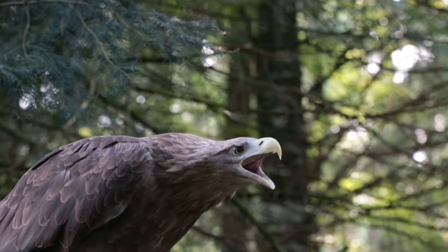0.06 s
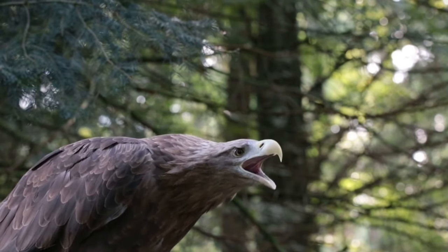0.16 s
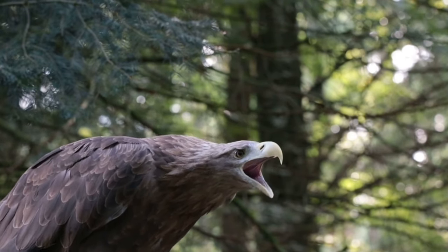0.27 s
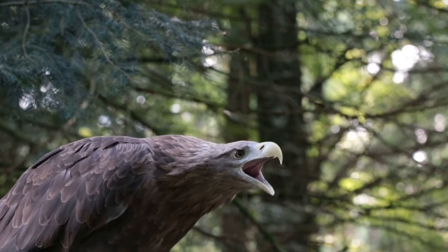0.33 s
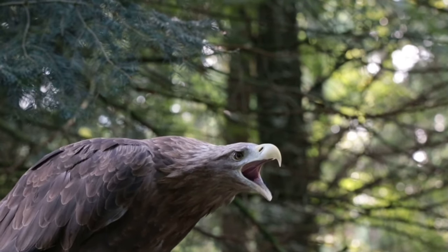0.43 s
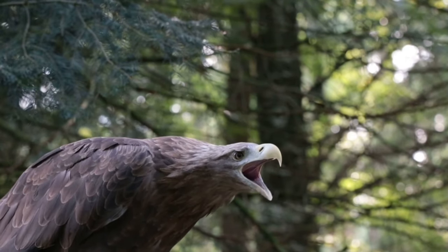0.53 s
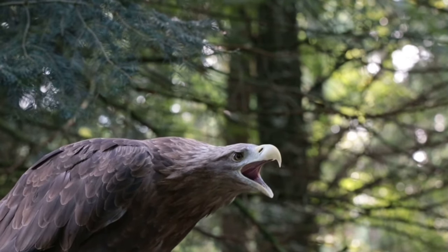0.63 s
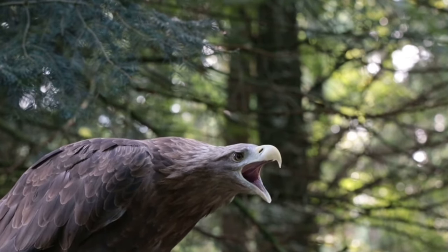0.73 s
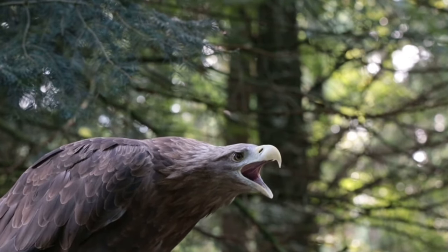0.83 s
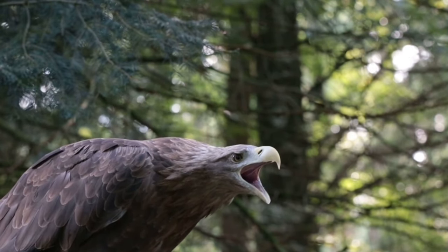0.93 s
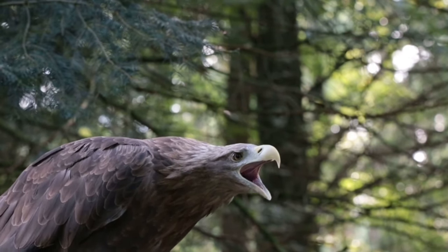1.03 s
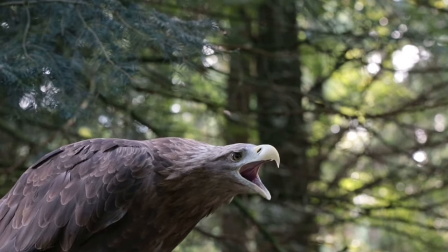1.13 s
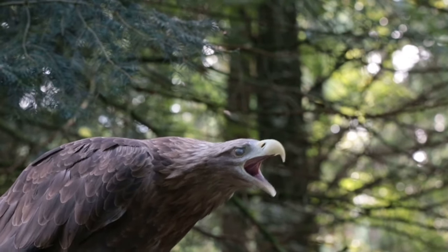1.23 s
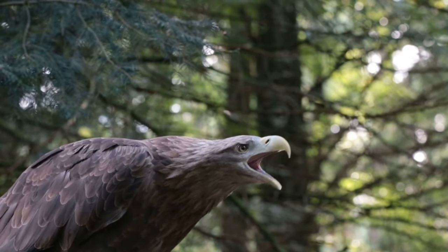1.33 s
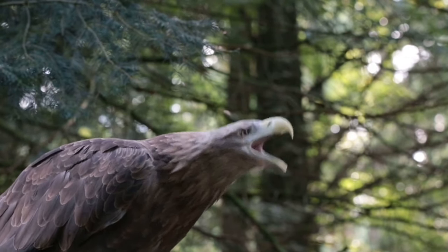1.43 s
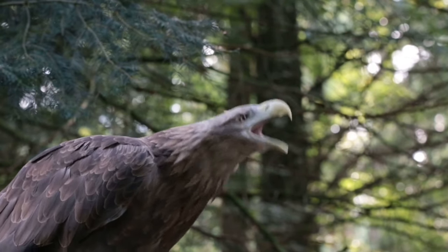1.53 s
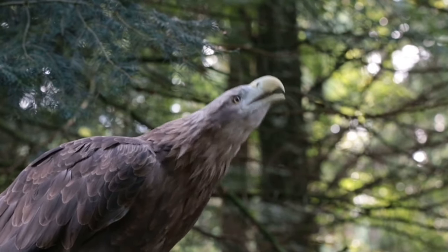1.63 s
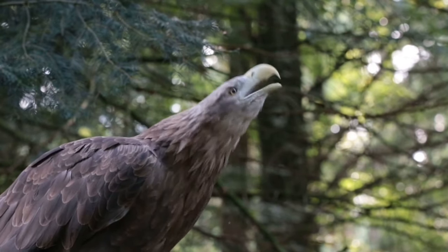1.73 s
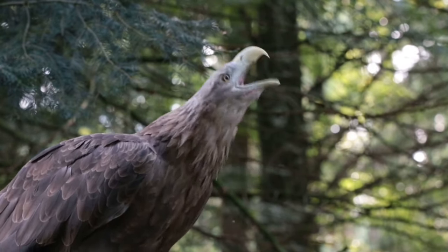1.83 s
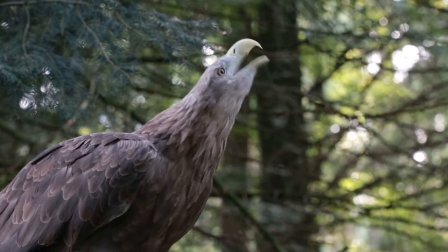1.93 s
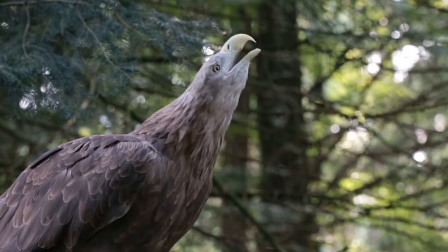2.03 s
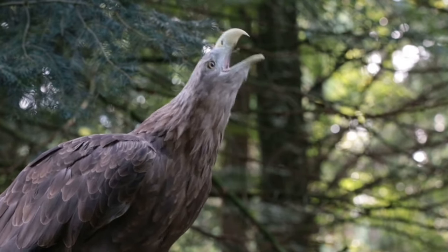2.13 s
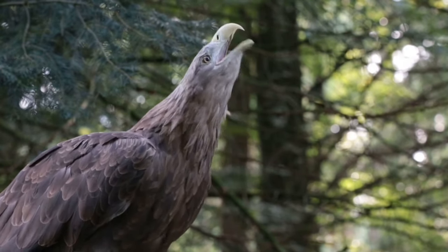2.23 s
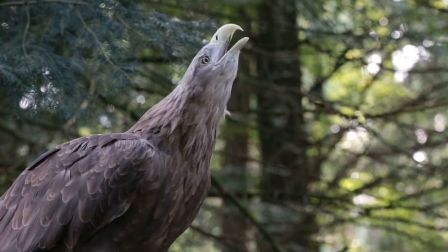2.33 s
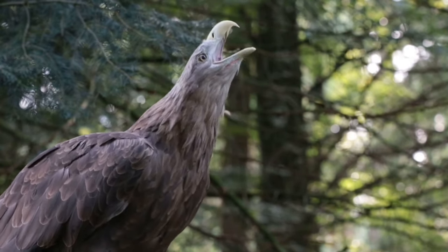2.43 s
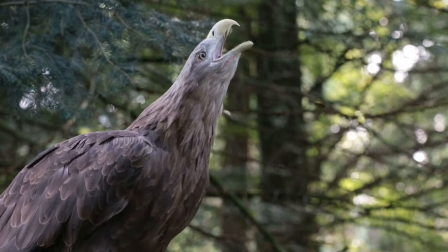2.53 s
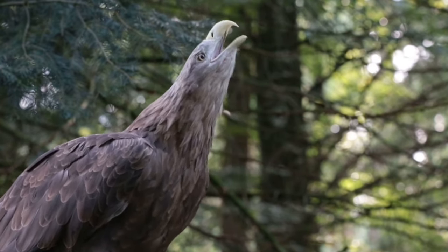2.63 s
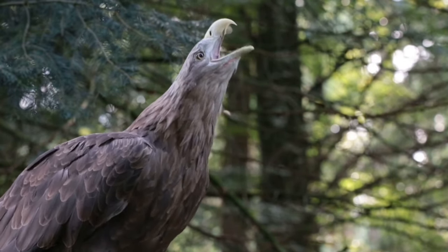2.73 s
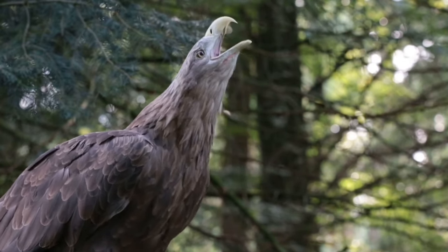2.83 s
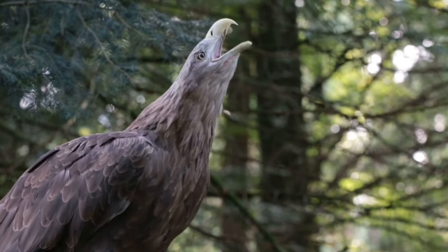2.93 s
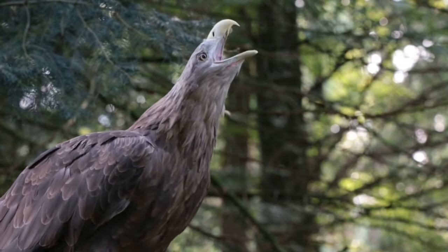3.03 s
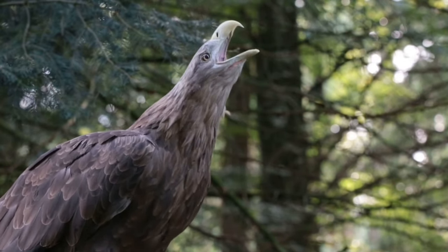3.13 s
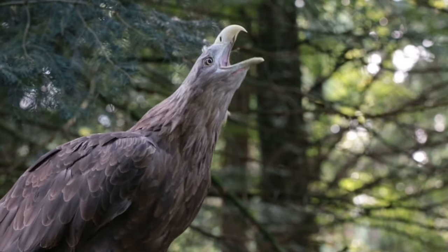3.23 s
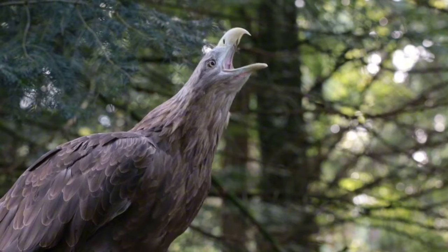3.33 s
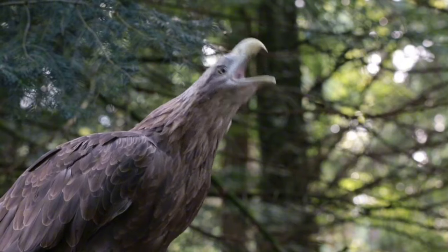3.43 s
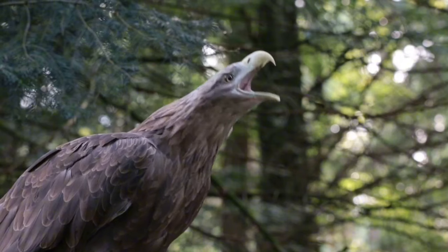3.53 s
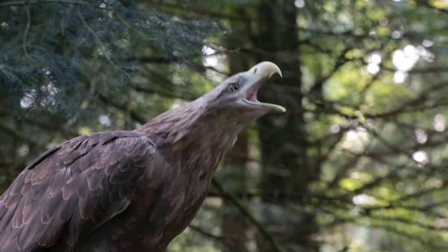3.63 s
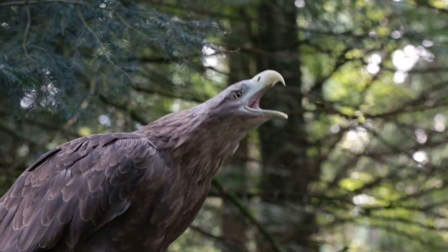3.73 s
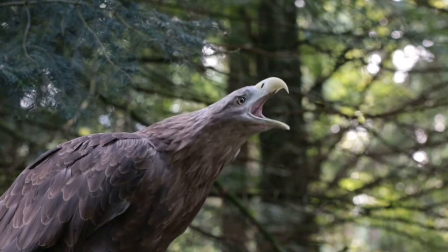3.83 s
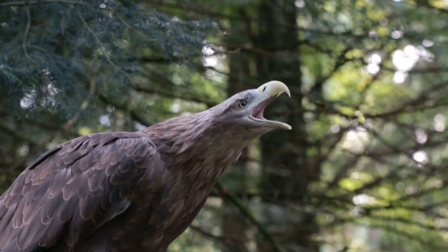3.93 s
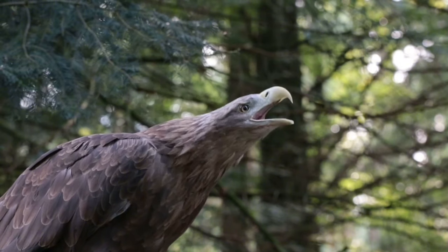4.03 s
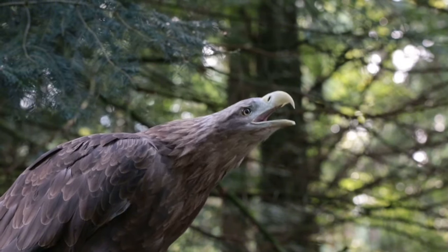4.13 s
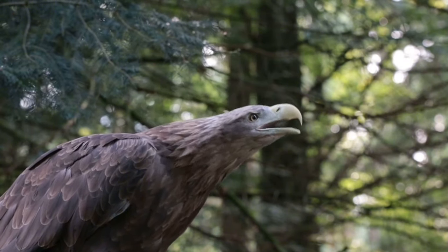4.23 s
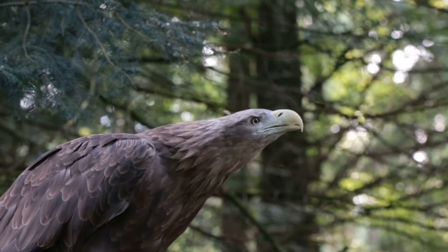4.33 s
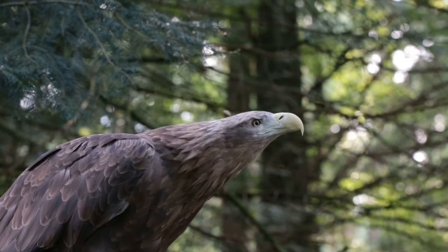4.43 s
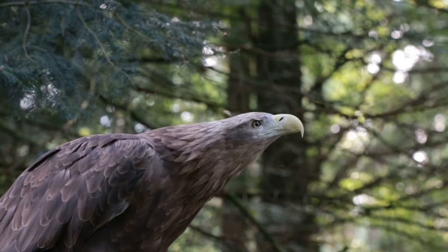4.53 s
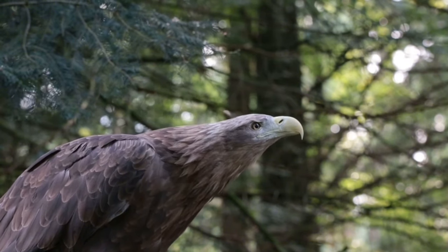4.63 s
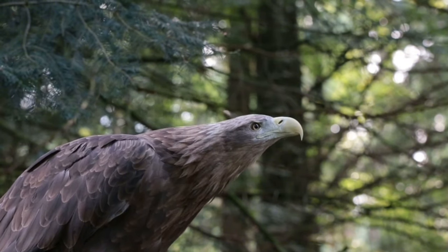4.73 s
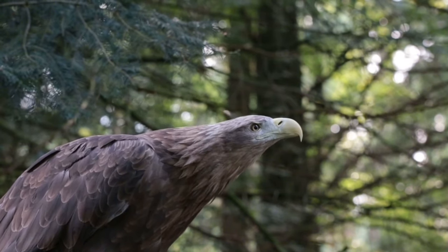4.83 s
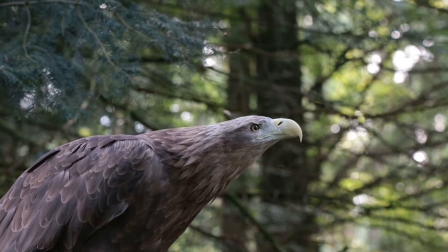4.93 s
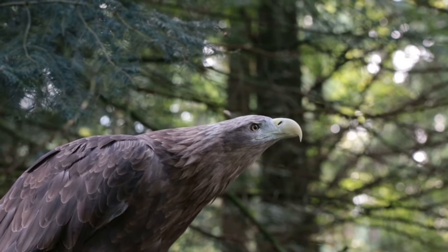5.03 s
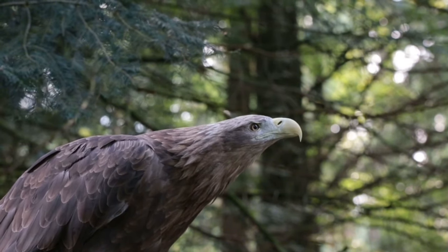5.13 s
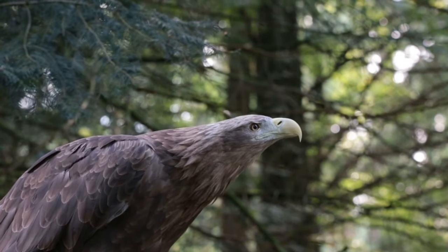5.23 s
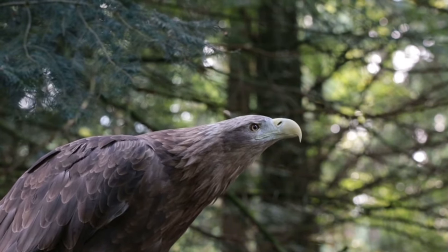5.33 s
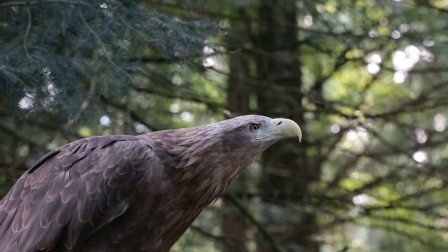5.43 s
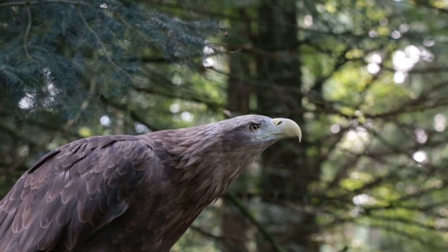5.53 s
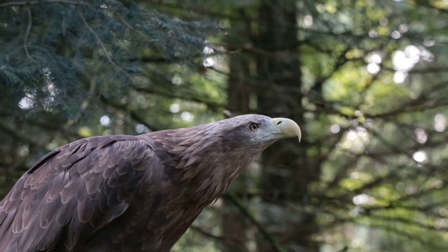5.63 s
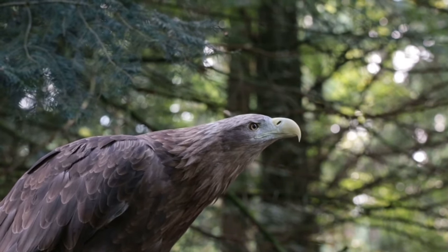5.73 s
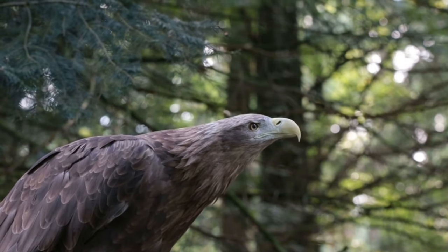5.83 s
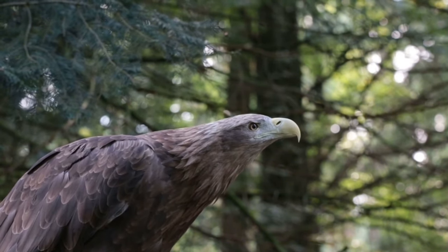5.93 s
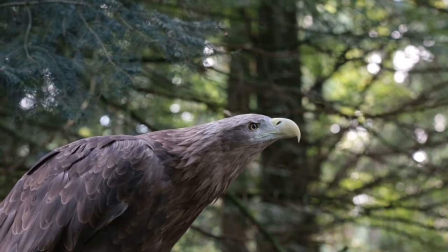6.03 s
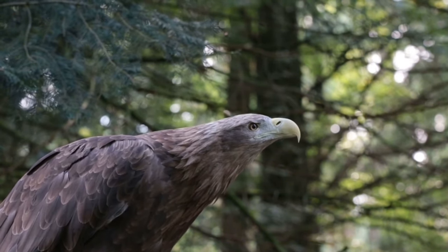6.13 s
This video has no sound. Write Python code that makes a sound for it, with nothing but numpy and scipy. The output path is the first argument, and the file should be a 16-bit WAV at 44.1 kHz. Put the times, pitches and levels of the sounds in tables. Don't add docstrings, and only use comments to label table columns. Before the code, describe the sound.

A large eagle close by yelps rapidly in a conifer wood, breaks into raspy clicking croaks, grunts once, then leaves quiet with faint rustles and insect ticks.

```python
import sys
import numpy as np
from scipy import signal
from scipy.fft import rfft, irfft, next_fast_len
from scipy.io import wavfile
from scipy.ndimage import uniform_filter1d, map_coordinates

SR = 44100
rng = np.random.default_rng(int(sys.argv[2]) if len(sys.argv) > 2 else 0)


def transcribe(u):
    v = np.clip(np.atleast_2d(u).T, -1, 1)
    q = np.round(v * 32767).astype(np.int16)
    wavfile.write(sys.argv[1], SR, q)


def volts(x):
    e = np.asarray(x, float) / 20
    return 10 ** e


N = 272083
LEAD = SR // 4
TOP_HZ = 15760

# frequency_hz, density_db (per Hz)
HUM_SPECTRUM = [(15, -67.5), (25, -46), (179, -33.5), (216, -21), (267, -20), (369, -14), (553, -11),
                (668, -1.5), (1350, -12.5), (1860, -21), (4060, -30), (15600, -48)]
# frequency_hz, correlation
HUM_LIKENESS = [(60, 0.91), (240, 1), (950, 0.21), (3770, 0.86), (15000, 0.27)]
HUM_DB = -63.5
# time_s, level_db
CRICKET_LEVEL = [
    (4.2, -95),
    (5.488, -89),
    (6.17, -107),
]
# start_s, length_s, level_db, grain_hz
RUSTLES = [(4.789, 0.0018, -56, 2090), (4.858, 0.031, -58.5, 2346), (4.862, 0.047, -67, 1124),
           (5.121, 0.051, -72.5, 2490), (5.456, 0.018, -58.5, 1900), (5.457, 0.018, -54.5, 796),
           (5.4714, .0005, -47, 2584), (5.4717, 0.00042, -54, 5200), (5.455, 0.0033, -58, 3220),
           (5.473, 0.062, -73, 2030)]
# frequency_hz, t60_s
WOOD_DECAY = [(300, 0.29), (800, 0.18), (2000, 0.58), (5500, 0.38), (12000, 0.5)]
# frequency_hz, left_over_right_db
PORT_BALANCE = [(300, -2.5), (1400, 3), (2800, -1.5), (5000, -2), (10000, -0.5)]
# frequency_hz, left_lead_rad
PORT_PHASE = [(1000, 0.11), (4000, 0.6), (9000, 1.2), (15000, 2.34)]

# centre_hz, width_hz, level_db
OPEN_THROAT = [(860, 705, 3), (1239, 910, 7), (1660, 420, 6), (2415, 330, -28), (3734, 360, 1.5)]
# centre_hz, width_hz, level_db
SHUT_THROAT = [(830, 220, -1.5), (1390, 196, 1.5), (1794, 170, 4.5), (3450, 390, -9.5)]
# first_s, last_s, level_db
CROAK_RUNS = [(0.506, .5076, -18.5), (0.7385, 0.745, -18.5), (0.984, 0.99, -15), (1.2153, 1.2254, -15.5),
              (1.7358, 1.7422, -5.5), (1.754, 1.7675, -4), (2.0575, 2.063, -7), (2.0736, 2.0983, -8),
              (2.355, 2.365, -10.5), (2.3766, 2.4082, -8), (2.662, 2.668, -10), (2.6798, 2.7111, -8),
              (2.9655, 2.97, -8.5), (2.9841, 3.0083, -9.5), (3.2577, 3.263, -8.5), (3.2758, 3.2946, -8.5),
              (3.5844, 3.595, -12)]
RUN_COUNTS = [1, 1, 1, 2, 2, 4, 2, 6, 2, 7, 2, 7, 2, 6, 2, 5, 2]
# time_s, level_db
LATE_CLICKS = [(1.459, -11), (1.747, -12), (1.775, -16.5), (1.7807, -12), (2.068, -14.5), (2.107, -15),
               (2.37, -19), (2.4161, -12.5), (2.6752, -17), (2.7192, -12), (2.9773, -14.5), (3.0144, -11.5),
               (3.2681, -15), (3.3018, -13.5), (3.5939, -21.5), (3.6033, -12)]
# time_s, level_db, rebound_db
DOUBLE_SLAPS = [(4.3898, -12, -1), (4.3966, -8, 3), (4.4034, 0.5, -5.5), (4.4103, -2.5, -9),
                (4.4173, -4, -11), (4.4243, -2.5, -4), (4.4315, -4, -1), (4.4393, -20, -4)]
RUN_FADE_DB = 3.5
BOUNCE_S, BOUNCE_DB, BOUNCE_HZ, BOUNCE_WIDTH_HZ = .0024, -3, 1720, 300
REBOUND_S = 0.00224

# frequency_hz, beak_level_db, beak_skyward_db
BEAK_RADIATION = [(1900, 9.5, -1), (2420, -4, -2), (2878, -11.5, -9.5), (3350, 5.5, -2), (4097, -13, -6),
                  (4350, -7.5, -18), (5050, -21, -27.5), (5420, -13.5, -20.5), (6770, -25.5, -32),
                  (7540, -20, -32.5), (8860, -32.5, -44), (12000, -57.5, -42.5), (15500, -64, -53.5)]
# frequency_hz, density_db (per Hz)
BREATH_SPECTRUM = [(300, -36), (800, -14.5), (1500, -1.5), (3300, -1), (5000, -16.5), (8000, -31),
                   (11000, -52), (15500, -46)]
# time_s, pitch_hz, fundamental_db, overtones_db
EARLIER_YELP = [(-.17, 1000, -63, -29), (-.16, 1032, -17, -13.5), (-.13, 1528, -12.5, -18),
                (-.08, 1582, -28.5, -38.5), (-.07, 1460, -62, -48)]
# time_s, pitch_hz, fundamental_db, overtones_db
SQUEAK = [
    (1.705, 5285, -62, -61.5),
    (1.711, 5320, -47.5, -60),
    (1.7136, 4425, -32, -67),
    (1.722, 3950, -37.5, -63),
]
# time_s, pitch_hz, fundamental_db, overtones_db
SLIP = [
    (2.03, 4390, -45.5, -67),
    (2.034, 4320, -34.5, -67.5),
    (2.041, 3796, -42.5, -67.5),
]
# time_s, pitch_hz, fundamental_db, overtones_db
SNAP = [
    (1.7205, 1825, -41.5, -45),
    (1.725, 1820, -12, -21.5),
    (1.73, 1798, -16, -26.5),
    (1.737, 1720, -26.5, -37),
]
# time_s, pitch_hz, fundamental_rms_db, overtones_rms_db
ARCH = [(0.171, 1063, -58, -37.5), (0.177, 1024, -26.5, -23), (0.189, 1201, -32, -20.5),
        (0.201, 1322, -25, -21), (0.211, 1360, -24.5, -23), (0.229, 1345, -24.5, -22.5),
        (0.237, 1330, -37.5, -24), (0.257, 1065, -31, -29.5), (0.268, 970, -51.5, -41.5)]
# time_s, pitch_hz, fundamental_rms_db, overtones_rms_db
BROKEN = [(1.623, 1091, -41, -42), (1.628, 1011, -28.5, -31), (1.631, 1251, -26.5, -26.5),
          (1.645, 1188, -26.5, -33), (1.653, 1515, -28.5, -46), (1.664, 1456, -42, -39.5)]
# time_s, pitch_hz, fundamental_rms_db, overtones_rms_db
SINKING = [
    [(3.512, 930, -47, -43), (3.519, 1067, -25.5, -26), (3.524, 1137, -32, -28), (3.529, 1282, -27, -23.5),
     (3.537, 1304, -20, -38), (3.54, 1575, -21, -28), (3.546, 1571, -23.5, -27), (3.555, 1620, -15.5, -21),
     (3.561, 1536, -30.5, -28)],
    [(3.755, 995, -35.5, -33), (3.763, 1065, -29, -24.5), (3.771, 1278, -25, -22),
     (3.781, 1269, -26.5, -24), (3.785, 1554, -18, -28.5), (3.793, 1587, -23, -19),
     (3.803, 1532, -23.5, -26), (3.819, 1531, -25, -32), (3.826, 1430, -36, -45.5)],
    [(4.008, 897, -44.5, -44), (4.015, 1077, -26, -21.5), (4.021, 1126, -33.5, -26.5),
     (4.029, 1273, -24, -19.5), (4.037, 1288, -24.5, -30.5), (4.041, 1556, -20, -25.5),
     (4.052, 1549, -22.5, -25.5), (4.074, 1507, -20, -29), (4.08, 1470, -26.5, -39.5)],
]
# first_s, last_s, from_hz, to_hz, level_db
GLIDES = [(0.437, 0.468, 1028, 1424, -25.5), (0.675, 0.706, 1067, 1438, -25),
          (0.915, 0.944, 1088, 1411, -25), (1.153, 1.1799, 1094, 1414, -25),
          (1.389, 1.418, 1087, 1423, -26)]
# peak_s, end_s, pitch_hz, fundamental_db, overtones_db
LOCKS = [(0.47, 0.487, 1594, -11.5, -14.5), (0.708, 0.723, 1608, -12.5, -14.5),
         (0.948, 0.965, 1640, -11.5, -14.5), (1.182, 1.198, 1649, -9.5, -11), (1.419, 1.436, 1616, -9, -13)]
# first_s, length_s, pitch_hz, fundamental_db, overtones_db
STEPS = [(1.9694, 0.0066, 1252, -19, -24), (1.9769, 0.003, 1353, -16.5, -25.5),
         (1.98, 0.0078, 1382, -20.5, -41.5), (2.299, 0.0067, 1197, -23, -24),
         (2.309, 0.0044, 1360, -19, -27.5), (2.315, 0.0049, 1390, -19, -40.5),
         (2.602, .008, 1157, -23.5, -23), (2.609, 0.0079, 1322, -20.5, -32),
         (2.618, 0.0056, 1337, -23.5, -37.5), (2.905, 0.0089, 1152, -25.5, -22),
         (2.913, 0.0066, 1372, -20.5, -32), (2.922, 0.0037, 1445, -23.5, -36.5),
         (3.198, 0.006, 1227, -23.5, -22), (3.206, 0.007, 1393, -18.5, -31.5),
         (3.214, 0.0049, 1433, -22, -37)]
# peak_s, end_s, pitch_hz, fundamental_db, overtones_db
SKY_LOCKS = [(1.995, 2.004, 1666, -14, -31), (2.327, 2.334, 1689, -13, -28.5),
             (2.63, 2.639, 1620, -11.5, -29.5), (2.934, 2.947, 1604, -12, -28),
             (2.957, 2.964, 1723, -12, -26), (3.227, 3.238, 1607, -11.5, -22.5)]
# peak_s, pitch_hz, fundamental_db, overtones_db
SWELLS = [(0.489, 1434, -24.5, -33.5), (0.497, 1105, -29.5, -17.5), (0.501, 929, -30, -23.5),
          (0.723, 1353, -23.5, -30.5), (0.736, 1130, -24.5, -17), (0.97, 1398, -23.5, -30),
          (0.975, 1259, -35, -18), (0.981, 937, -31.5, -23.5), (1.2067, 1510, -16.5, -24),
          (1.2107, 1493, -19, -23), (1.217, 925, -29, -24), (1.446, 1648, -14.5, -17),
          (1.457, 898, -28.5, -23.5), (3.565, 1520, -21.5, -29.5), (3.5735, 1649, -16, -21.5),
          (3.58, 1613, -24, -28), (3.589, 1587, -22.5, -32), (3.597, 1750, -18.5, -25.5),
          (3.828, 1506, -19, -26.5), (3.8335, 922, -26.5, -25.5), (3.8375, 934, -26, -26.5),
          (4.082, 1513, -20, -28), (4.088, 951, -29.5, -29.5), (4.0948, 917, -28, -21.5)]
# peak_s, pitch_hz, fundamental_db, overtones_db
SKY_SWELLS = [(2.0443, 1870, -17, -23.5), (2.0512, 1742, -17.5, -27.5), (2.346, 1652, -14, -23),
              (2.352, 1720, -18, -25), (2.6495, 1765, -12.5, -21), (2.656, 1670, -14, -33),
              (2.945, 1585, -20.5, -30.5), (2.925, 1605, -21, -28.5), (2.953, 1720, -18.5, -28),
              (3.2363, 1544, -15, -31), (3.242, 1565, -15.5, -18.5), (3.249, 1566, -13.5, -22),
              (3.255, 1547, -15, -22.5), (1.7457, 2120, -33, -34.5), (1.748, 1840, -21.5, -31.5),
              (2.3388, 1480, -29, -37), (2.643, 1630, -22.5, -36.5), (2.669, 1640, -20.5, -36.5),
              (2.673, 1782, -25, -30), (3.266, 1900, -25, -29), (3.2693, 1720, -18, -30)]
# peak_s, pitch_hz, fundamental_db, overtones_db
BARKS = [(.5145, 1137, -21.5, -14), (0.7512, 1726, -14, -22), (0.9918, 1473, -16.5, -26),
         (1.2206, 1575, -25.5, -29.5), (1.2266, 1504, -17.5, -26), (1.23, 1850, -17, -30.5),
         (1.465, 1877, -15, -28.5)]

SKYWARD_S = (1.6, 3.4)
PEAK_OVER_RMS_DB = 2.5
SCOOP_HZ, ONSET_S, ONSET_DB = 130.2, 0.0039, -32
OVER_OUT_DB = (5, 7.5, 4)
MODE_HZ, MODE_S = (1164, 1294), (.0045, .0105, 0.01448)
CHOKE_S, GLIDE_GAINS_DB = .003, 4.5
SETTLE_S, SKY_SETTLE_S = .003, .0055
SETTLE_DB, SETTLE_HZ, HOLD_OVER_DB = -6.5, 85, (-11.5, -7)
RELEASE_S, RELEASE_DB, RELEASE_HZ = 0.0091, -25.5, 302.6
SKY_RISE_S, SKY_RISE_DB, SKY_SAG = 0.008, -11, 0.21
STEP_SCOOP_HZ, STEP_ONSET_S, STEP_ONSET_DB = 265, .007, -10
FROM_ABOVE_HZ = 1500
STEP_FADE_DB, STEP_OVER_FADE_DB, CREEP_HZ_PER_S, LATE_OVER_DB = 3, 7.5, -6000, -9
SWELL_RISE_S, SWELL_FALL_S, SWELL_FOOT_DB = 0.0084, 0.0082, -21.5
SKY_SWELL_RISE_S, SKY_SWELL_FALL_S = 0.0036, 0.0069
LOOSE_HZ = (1000, 1350)
DROP_HZ_PER_S, SAG_HZ_PER_S = 45000, 48000
BARK_RISE_S, BARK_FALL_S, BARK_FOOT_DB = .0032, 0.0023, -16.5


def unit(x):
    return x / np.sqrt(np.mean(x ** 2) + 1e-20)


def along(points, hz):
    f, v = np.transpose(points)
    return np.interp(np.log(hz + 1), np.log(f + 1), v)


def wobble(rate, size):
    knots = rng.standard_normal(int(size * rate / SR) + 4)
    return map_coordinates(knots, [np.arange(size) * rate / SR])


def filtered(x, response):
    m = next_fast_len(x.shape[-1] + 8192)
    spectrum = rfft(x, m) * response(np.fft.rfftfreq(m, 1 / SR))
    return irfft(spectrum, m)[..., :x.shape[-1]]


def noise(response, shape=N + LEAD):
    return unit(filtered(rng.standard_normal(shape), response))


def hum():
    turn = lambda hz: np.arccos(np.clip(along(HUM_LIKENESS, hz), -1, 1)) / 2
    colour = lambda hz: volts(along(HUM_SPECTRUM, hz)) * [np.cos(turn(hz)), np.sin(turn(hz))]
    mid, side = filtered(rng.standard_normal((2, N)), colour)
    drift_db = 0.76 * wobble(6.5, size=N)
    return volts(HUM_DB + drift_db) * unit(np.array([mid + side, mid - side]))


def cricket():
    t = np.arange(N) / SR
    cycle_s = ((t - 4.631) / .0722 - np.maximum(t - 5.3, 0)) % 1 * .0722
    strokes = np.exp(-((cycle_s - .003) / 0.004) ** 2) + np.exp(-((cycle_s - .028) / 0.0042) ** 2)
    buzz = noise(lambda hz: np.exp(-((hz - 10200) / 800) ** 2), (2, N))
    level_db = np.interp(t, *np.transpose(CRICKET_LEVEL)) + 6.5 + 2 * wobble(5.1, size=N)
    return volts(level_db) * strokes * (buzz + 0.42 * buzz[0])


def shuffles():
    out, t = np.zeros(N), np.arange(300) / SR
    for start_s, length_s, level_db, grain_hz in RUSTLES:
        when, pitch, size = rng.random((3, 90))[:, :1 + int(length_s * 1600)]
        pitch_hz = (grain_hz * 2 ** (1.1 * pitch - .6))[:, None]
        envelope = np.sin(np.pi * np.minimum(pitch_hz * t / 3, 1)) ** 2
        grains = volts(level_db + 3.33 * size[:, None]) * envelope * np.sin(2 * np.pi * pitch_hz * t)
        grain_s = start_s + length_s * (np.arange(len(when)) + when) / len(when)
        at = (grain_s * SR).astype(int)[:, None] + np.arange(len(t))
        out += np.bincount(at.ravel(), grains.ravel(), N)
    return out


def wood(x):
    hz, t, z = signal.stft(rng.standard_normal((2, SR)), SR, nperseg=256)
    reverberation = volts(-60 * t / along(WOOD_DECAY, hz)[:, None])
    early = volts(12 - 60 * t / .07) * (1 - np.exp(-t / 0.0066))
    late = volts(-13.0 - 60 * t / 1.1)
    common, apart = signal.istft(z * (reverberation + early + late), SR, nperseg=256)[1]
    tail = np.array([common + 0.45 * apart, common - 0.29 * apart]) / np.linalg.norm(common)
    delayed = np.pad(x, (500, 0))[None]
    return signal.fftconvolve(delayed, tail, axes=1)[:, :len(x)]


def resonator(f, centre_hz, width_hz):
    return 1j * f * width_hz / (centre_hz ** 2 - f * f + 1j * f * width_hz)


def throat(modes, f):
    return sum((-1) ** k * volts(db) * resonator(f, c, w) for k, (c, w, db) in enumerate(modes))


def grunt():
    slaps = np.zeros(N + LEAD)
    s, db, rebound_db = np.transpose(DOUBLE_SLAPS)
    slaps[LEAD + np.round(s * SR).astype(int)] = volts(db)
    rebound_s = s + REBOUND_S + .00012 * rng.standard_normal(len(s))
    slaps[LEAD + np.round(rebound_s * SR).astype(int)] = volts(db + rebound_db)
    return filtered(slaps, lambda f: throat(SHUT_THROAT, f) * (3000 / (3000 + 1j * f)) ** 3)


def croaks():
    slaps, hiss = np.zeros(N + LEAD), np.zeros(N + LEAD)
    runs = [(*run, count) for run, count in zip(CROAK_RUNS, RUN_COUNTS)]
    runs += [(s, s, db, 1) for s, db in LATE_CLICKS]
    for first_s, last_s, level_db, count in runs:
        way = np.linspace(0, 1, count)
        chance = rng.standard_normal((count, 2))
        slowing = way - .05 * np.sin(np.pi * way) / 2
        click_s = first_s + (last_s - first_s) * slowing + 0.0001 * chance[:, 0]
        at = LEAD + np.round(click_s * SR).astype(int)
        slaps[at] = -volts(level_db - RUN_FADE_DB * np.abs(way - .2) + 0.37 * chance[:, 1])
        hiss[at[0]:at[-1] + 200] = volts(level_db - 29)
    ring = lambda f: throat(OPEN_THROAT, f)
    thin = lambda f: (1j * f / (220 + 1j * f)) ** 3
    soft = lambda f: (3500 / (3500 + 1j * f)) ** 5
    delay = lambda f: np.exp(-2j * np.pi * f * BOUNCE_S)
    bounce = lambda f: volts(BOUNCE_DB) * delay(f) * resonator(f, BOUNCE_HZ, BOUNCE_WIDTH_HZ)
    air = noise(lambda f: ring(f) * thin(f) * soft(f))
    fizz = noise(lambda f: volts(-9 * np.log2((f + 1) / 6000) ** 2))
    flow = uniform_filter1d(hiss, size=300)
    clicks = filtered(volts(19.5) * slaps, lambda f: (ring(f) + bounce(f)) * thin(f) * soft(f))
    return clicks + flow * air + volts(15.5) * flow ** 2 * fizz


def glide(first, last, from_hz, to_hz, db):
    onset, bloom, top = OVER_OUT_DB
    (low_hz, high_hz), (reached, left, jumped) = MODE_HZ, MODE_S
    top_db = db + GLIDE_GAINS_DB
    return [(first - ONSET_S, from_hz - SCOOP_HZ, db + ONSET_DB, db + ONSET_DB),
            (first, from_hz - SCOOP_HZ / 2, db - 0.5, db + onset),
            (first + reached, low_hz, db - 2.5, db + bloom),
            (first + left, low_hz + 25, db - 0.8, db + bloom),
            (first + jumped, high_hz, db + .2, db + bloom - .7),
            (last - CHOKE_S, to_hz - 15, top_db, db + top),
            (last, to_hz + 22, top_db, db + top)]


def lock(peak, end, hz, db, over_db, sag):
    early_db, late_db = HOLD_OVER_DB
    skyward = SKYWARD_S[0] < peak < SKYWARD_S[1]
    settle = min(peak + (SKY_SETTLE_S if skyward else SETTLE_S), end - 3e-4)
    close = min(max(end - RELEASE_S, settle + 1e-4), end - 1e-4)
    return [(peak, hz, db, over_db),
            (settle, hz - sag * SETTLE_HZ / 2, db + SETTLE_DB, over_db + early_db),
            (close, hz - sag * SETTLE_HZ, db + SETTLE_DB, over_db + late_db),
            (end, hz - sag * RELEASE_HZ, db + RELEASE_DB, over_db + RELEASE_DB)]


def sky_lock(peak, end, hz, db, over_db):
    rise = (peak - SKY_RISE_S, hz - SETTLE_HZ, db + SKY_RISE_DB, over_db)
    return [rise] + lock(peak, end, hz, db, over_db, SKY_SAG)


def step(first, length, hz, db, over_db):
    scoop_hz = STEP_SCOOP_HZ if hz < FROM_ABOVE_HZ else -STEP_SCOOP_HZ
    near_hz = 30 if hz < FROM_ABOVE_HZ else -30
    return [(first - STEP_ONSET_S, hz - scoop_hz, db + STEP_ONSET_DB, over_db + STEP_ONSET_DB + LATE_OVER_DB),
            (first - .002, hz - scoop_hz * .6, db - 13.5, over_db - 11 + LATE_OVER_DB),
            (first, hz - near_hz, db, over_db),
            (first + 0.33 * length, hz, db - 1.5, over_db - 0.5),
            (first + length, hz + CREEP_HZ_PER_S * length, db - STEP_FADE_DB, over_db - STEP_OVER_FADE_DB)]


def swell(peak, hz, db, over_db, rise, fall, sag):
    loose = LOOSE_HZ[0] < hz < LOOSE_HZ[1]
    hz_per_s = DROP_HZ_PER_S if loose else sag * SAG_HZ_PER_S * (hz > LOOSE_HZ[1])
    foot_db, over_foot_db = db + SWELL_FOOT_DB, over_db + SWELL_FOOT_DB
    return [(peak - rise, hz + loose * hz_per_s * rise, foot_db, over_foot_db),
            (peak, hz, db, over_db),
            (peak + fall, hz - hz_per_s * fall, foot_db, over_foot_db)]


def bark(peak, hz, db, over_db):
    foot_db, over_foot_db = db + BARK_FOOT_DB, over_db + BARK_FOOT_DB
    return [(peak - BARK_RISE_S, hz, foot_db, over_foot_db),
            (peak, hz, db, over_db),
            (peak + BARK_FALL_S, hz - 60, foot_db, over_foot_db)]


def gestures():
    peak_db = [0, 0, PEAK_OVER_RMS_DB, PEAK_OVER_RMS_DB]
    drawn = [np.add(rows, peak_db) for rows in [ARCH, BROKEN, *SINKING]]
    level = [glide(*up) + lock(*held, sag=1) for up, held in zip(GLIDES, LOCKS)]
    level += [swell(*row, SWELL_RISE_S, SWELL_FALL_S, sag=1) for row in SWELLS]
    level += [bark(*row) for row in BARKS]
    sky = [sky_lock(*row) for row in SKY_LOCKS] + [step(*row) for row in STEPS]
    sky += [swell(*row, SKY_SWELL_RISE_S, SKY_SWELL_FALL_S, SKY_SAG) for row in SKY_SWELLS]
    return [EARLIER_YELP, SQUEAK, SLIP, SNAP, *drawn, *level, *sky]


def yelps():
    voice, drive = np.zeros(N + LEAD), np.zeros(N + LEAD)
    order = np.arange(2, 13)[:, None]
    beak_hz, level_db, skyward_db = np.transpose(BEAK_RADIATION)
    for rows in gestures():
        s, *cols = np.transpose(rows)
        t = np.arange(s[0], s[-1], 1 / SR)
        hz, first_db, over_db = (uniform_filter1d(np.interp(t, s, c), size=60) for c in cols)
        skyward = SKYWARD_S[0] < s[0] < SKYWARD_S[1] and rows is not SQUEAK
        rising = np.clip(np.gradient(hz) * SR / 6000, 0, 1)
        hz = hz - 18 * rising * np.sin(2 * np.pi * (hz - 1160) / 160)
        edge = np.clip(np.minimum(t - s[0], s[-1] - t) * 700, 0, 1)
        jitter = (0.004 + 0.005 * skyward) * wobble(350, size=len(t))
        phase = 2 * np.pi * np.cumsum(hz * (1 + jitter)) / SR
        flutter_db = (3.6 + 2 * skyward) * np.tanh([wobble(220, size=len(t)) for _ in order])

        share_db = np.interp(order * hz, beak_hz, skyward_db if skyward else level_db)
        share_db = share_db - 12.0 * np.maximum(order - 3.1, 0) * (1 - hz / 1900)
        share_db = share_db - 3.5 * rising * (order > 4)
        shares = volts(share_db) * (order * hz < TOP_HZ)
        shares = volts(flutter_db) * shares / np.sqrt(np.sum(shares[:3] ** 2, axis=0) + 1e-9)
        start_phase = rng.uniform(0, 2 * np.pi, order.shape)
        overtones = np.sum(shares * np.sin(order * phase + start_phase), axis=0)

        at = round(s[0] * SR) + LEAD
        tremor_db = 1.3 * wobble(390, size=len(t))
        fundamental = volts(first_db + tremor_db) * np.sin(phase)
        voice[at:][:len(t)] += edge * (fundamental + volts(over_db) * overtones)
        drive[at:][:len(t)] += edge * (volts(first_db - 2.0) + volts(over_db))
    air = noise(lambda hz: volts(along(BREATH_SPECTRUM, hz)))
    spray = noise(lambda hz: volts(-11 * np.log2((hz + 1) / 6300) ** 2 - 12 * (hz > 9700)))
    jet_edge = noise(lambda hz: np.exp(-((hz - 14300) / 2300) ** 2))
    breath = volts(-19) * drive * air
    pressure = np.roll(uniform_filter1d(drive, size=1400), shift=700, axis=0)
    leak = volts(-38 + 1.1 * wobble(38, size=N + LEAD)) * pressure * spray
    sizzle = volts(-53 + 6 * wobble(67, size=N + LEAD)) * drive * jet_edge
    puff = filtered(drive, lambda hz: (200j * hz / (200 + 1j * hz) ** 2) ** 0.56)
    return volts(0.44) * voice + volts(-38) * puff + sizzle + breath + leak


def scene():
    bird = yelps() + croaks() + grunt()
    half = [.5, -.5]
    balance = lambda hz: volts(np.outer(half, along(PORT_BALANCE, hz)))
    lead = lambda hz: np.exp(1j * np.outer(half, along(PORT_PHASE, hz)))
    calls = filtered(bird, lambda hz: balance(hz) * lead(hz)) + volts(-10.5) * wood(bird)
    near = calls[:, LEAD:] + shuffles() * volts([[.5], [-.5]])
    low_cut = lambda hz: (1j * hz / (120 + 1j * hz)) ** 2
    return filtered(near, low_cut) + cricket() + hum()


def low_pass(x):
    return signal.sosfilt(signal.butter(12, 15745, fs=SR, output="sos"), x)


def record(dry):
    mix = filtered(dry, lambda hz: hz < TOP_HZ)
    return low_pass(mix)


dry = scene()
out = record(dry)
transcribe(out)
```